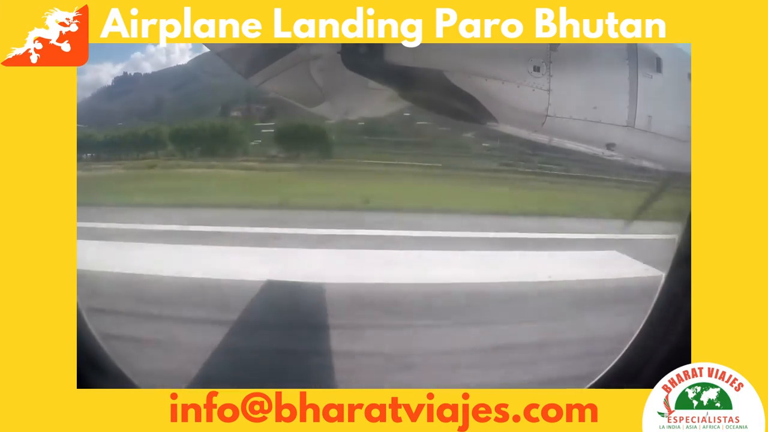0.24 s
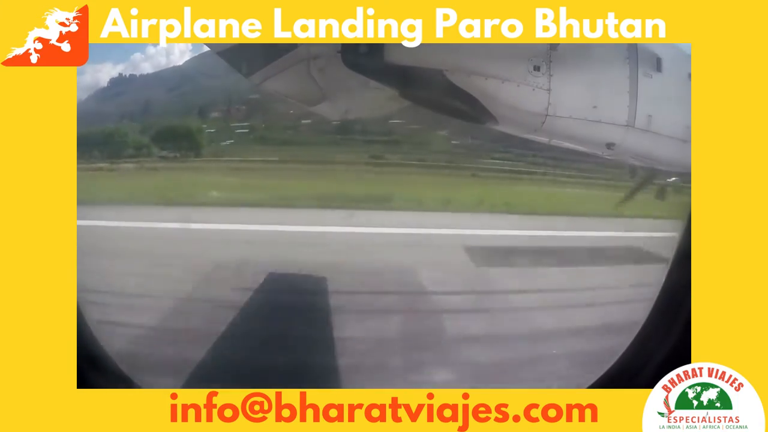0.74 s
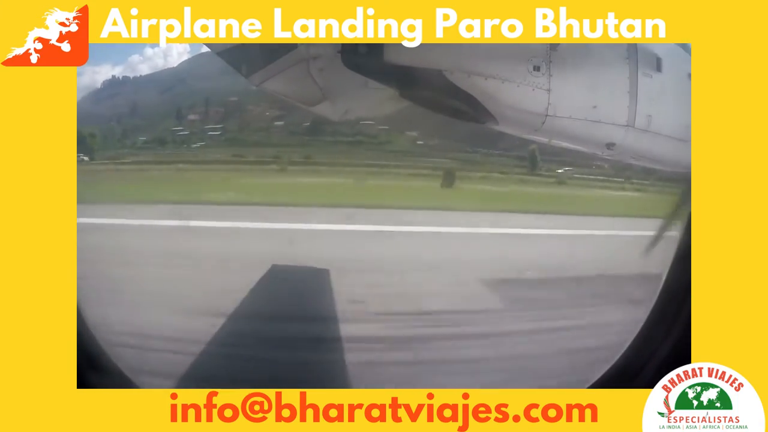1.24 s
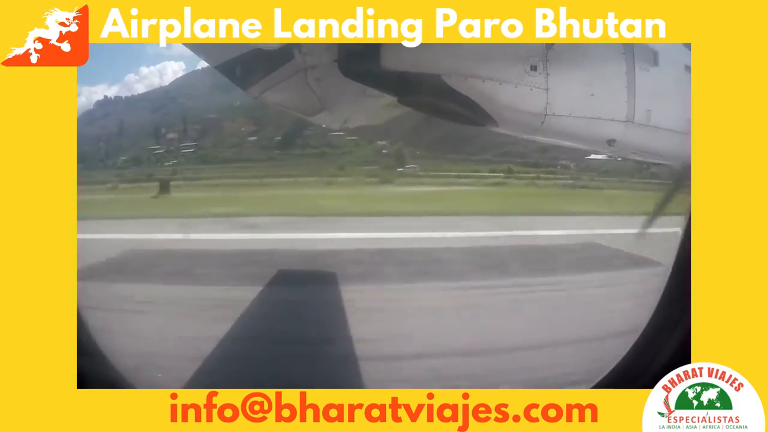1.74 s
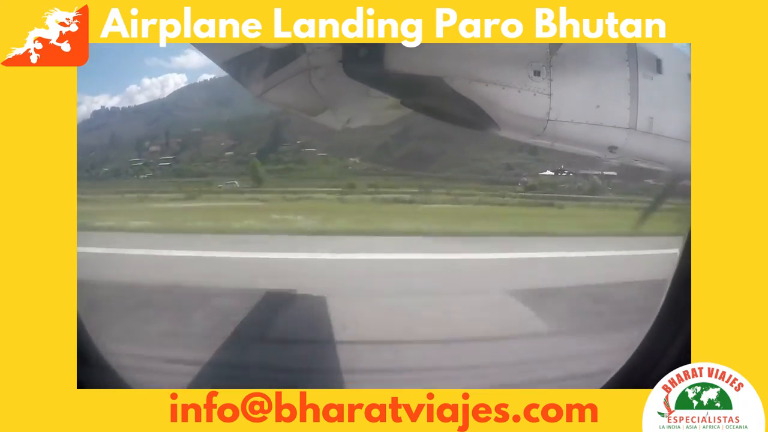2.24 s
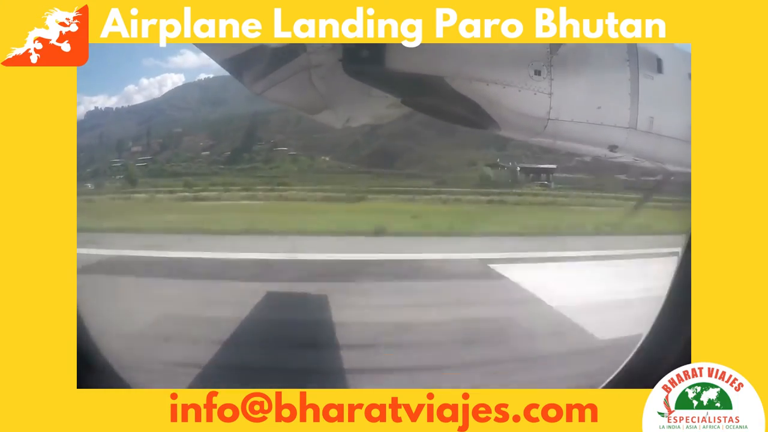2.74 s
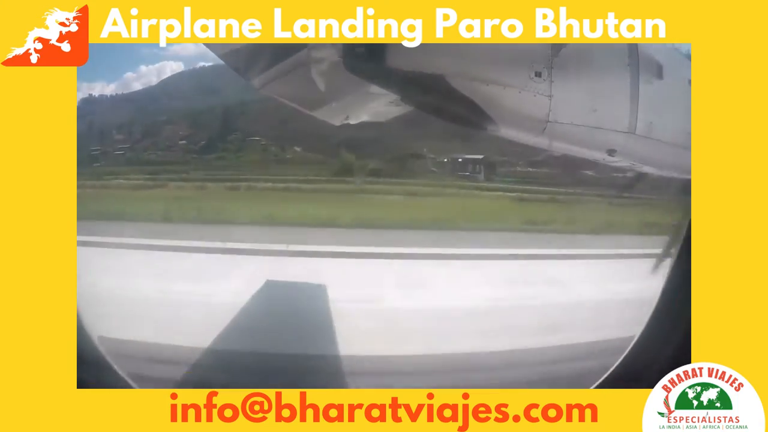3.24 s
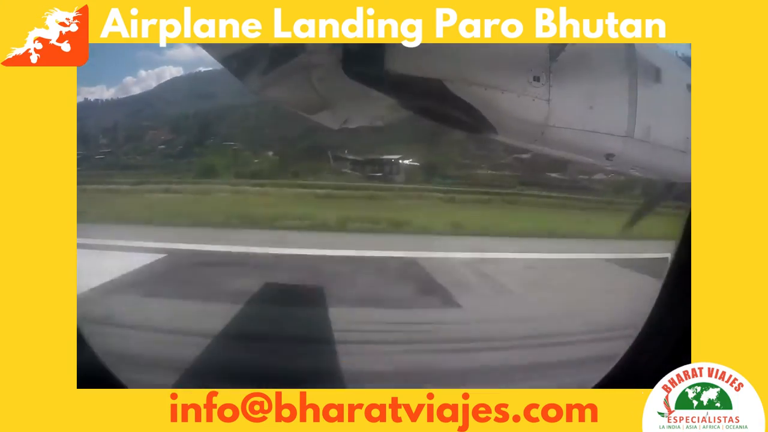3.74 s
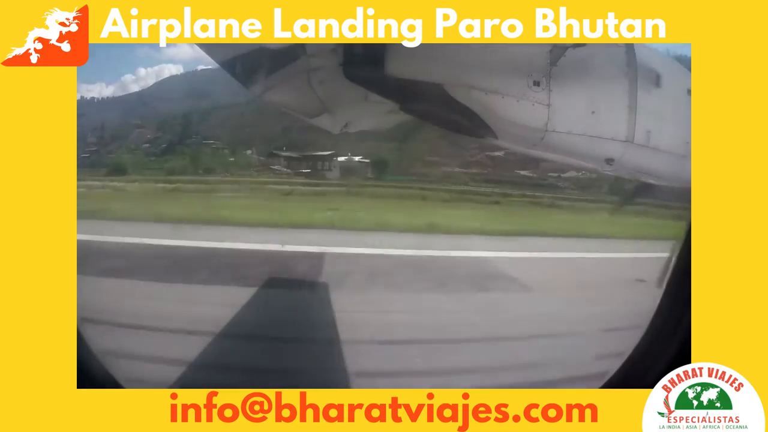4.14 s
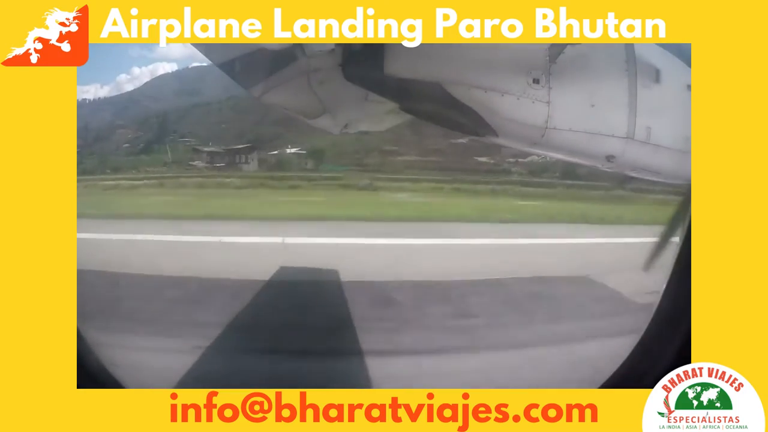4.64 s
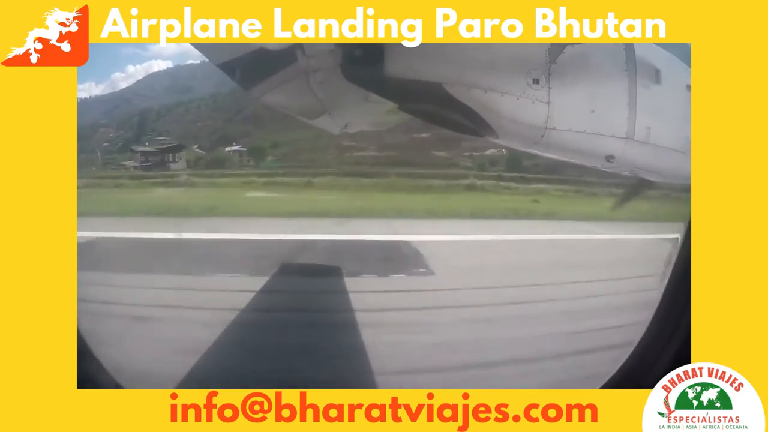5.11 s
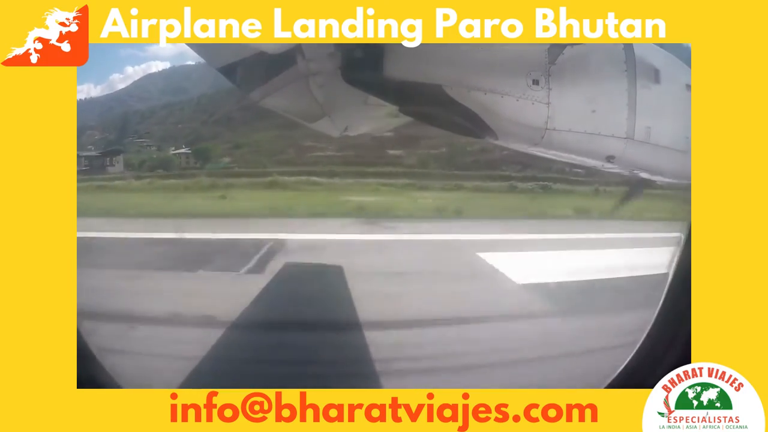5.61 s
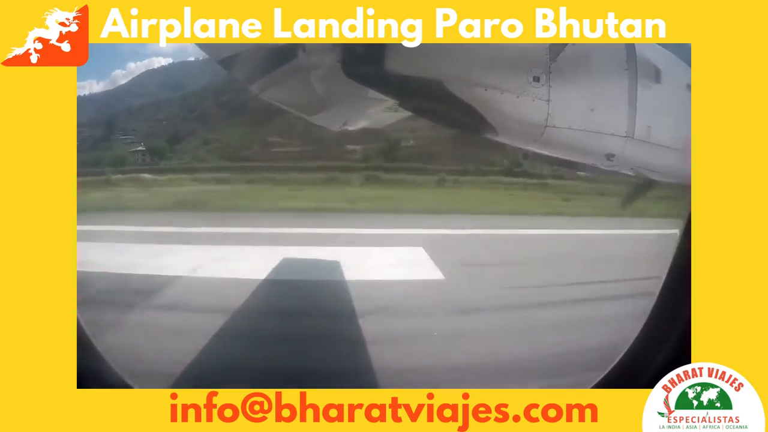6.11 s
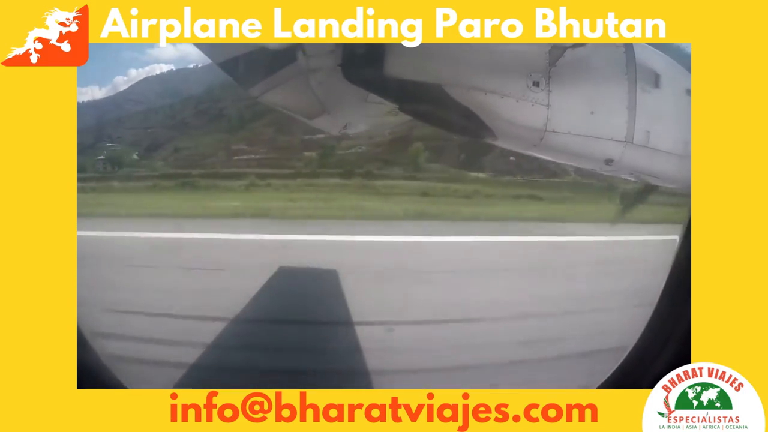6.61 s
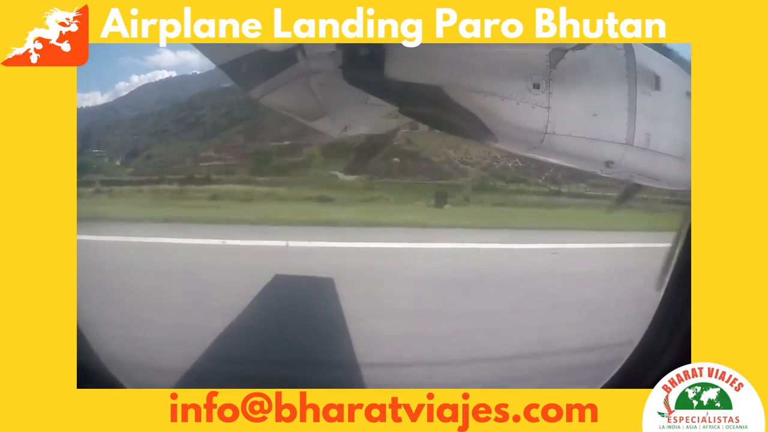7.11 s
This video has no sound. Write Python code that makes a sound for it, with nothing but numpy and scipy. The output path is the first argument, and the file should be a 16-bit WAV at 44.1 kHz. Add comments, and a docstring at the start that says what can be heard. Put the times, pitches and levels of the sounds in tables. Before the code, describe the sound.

A muffled low hum and soft air fill a passenger cabin before landing. At touchdown the floor shudders, the runway booms and roars, and fittings clatter in bursts. Midway the nose settles, with a rapid burst of hard plastic knocking, followed later by separate loud clacks. Broad engine noise builds, dips and returns as the aircraft slows. The microphone sits inside by the window, picking up loud knocks dry and close.

```python
"""Airliner cabin at landing

Air, vents and engine tones fill the cabin as shaped noise and wavering sines; then the wheels touch.
The tyres drone at multiples of their slowing rotation, the runway rumbles and roars as coloured noise,
and the engines' rush swells. Jolts, rattling fittings, a loose plastic case knocking on the window and
snapping wall trim are made by striking decaying sines, mostly with single clicks."""
import sys
import numpy as np
from scipy import signal
from scipy.fft import rfft, irfft
from scipy.io import wavfile

SR = 44100
rng = np.random.default_rng(int(sys.argv[2]) if len(sys.argv) > 2 else 0)


def persist_wave(psi):
    """Save psi, clipped to +-1, as 16-bit WAV."""
    counts = np.round(np.clip(psi, -1, 1) * 32767).astype(np.int16)
    wavfile.write(sys.argv[1], SR, np.atleast_2d(counts).T)


N = 324576
TIME = np.arange(N) / SR
# the main wheels touch; later the nose comes down and braking begins (s)
TOUCHDOWN_S, BRAKING_S = 1.545, 3.45


def tyres(flutter_db=2.0, wobble_hz=0.17):
    """Out-of-round tyres shake the airframe at multiples of their rotation; cabin resonances swell them."""
    # strength of the shaking at 1, 2, 3 .. times the rotation: relative level/dB
    orders_db = [-2, -3, -1, -1, -1.5, -2.5, -17, -11.5, 0]
    # how loudly the cabin answers, with resonances near 62, 118, 139 and 175 Hz: f/Hz, relative level/dB
    cabin_response = [(20, -32.5), (48, -37.5), (57, -22.5), (62.5, -14), (69, -29), (92, -35),
                      (105, -23.5), (119, -17.5), (125, -27), (137, -17.5), (141.3, -13.5), (144, -41),
                      (175, -27), (200, -49.5)]
    # weight on the tyres as the aircraft bounces and settles, as strength of shaking: t/s, level/dB
    tyre_load = [(1.545, -0.5), (1.72, 0.5), (2.15, 2.5), (2.3, -13), (2.48, -9), (2.68, -1), (3.15, -1),
                 (3.32, -6.5), (3.5, -1), (3.72, 2.5), (4.2, 0), (4.85, 1.5), (4.98, -8), (5.12, -0.5),
                 (7.36, -2)]
    spin_hz = 24.28                                   # turns per second at touchdown
    coast_hz_per_s, brake_hz_per_s = 0.6, 1.05        # rotation lost each second
    coasted_s = np.minimum(TIME, BRAKING_S) - TOUCHDOWN_S
    braked_s = np.maximum(TIME - BRAKING_S, 0)
    turn_hz = spin_hz - coast_hz_per_s * coasted_s - brake_hz_per_s * braked_s
    response_hz, response_db = np.transpose(cabin_response)
    drone = 0
    for k, order_db in enumerate(orders_db, start=1):
        flutter, wobble = drift(6), drift(8)
        cabin_db = np.interp(k * turn_hz, response_hz, response_db)
        level_db = order_db + cabin_db + flutter_db * flutter
        drone = drone + from_db(level_db) * tone(k * (turn_hz + wobble_hz * wobble))
    load_db, = in_time(tyre_load)
    return from_db(load_db) * drone


def runway():
    """Uneven pavement rumbles through the landing gear, the panels boom and the tread roars."""
    # colour of the low rumble: f/Hz, relative level/dB per Hz
    rumble_colour = [(10, -26), (20, -2.5), (28, 5), (45, 0), (60, 5.5), (78, 0), (98, -3), (125, -4),
                     (155, -12), (200, -9)]
    # colour of the booming panels: f/Hz, relative level/dB per Hz
    panel_colour = [(94, -44), (160, -2.5), (227, -2), (302, -8), (317, -9), (345, -7), (394, -2),
                    (420, -6.5), (454, -23), (480, -21), (620, -45), (1060, -120)]
    # colour of the tread's roar: f/Hz, relative level/dB per Hz
    roar_colour = [(260, -29.5), (450, 1), (496, -3), (601, -1), (650, -12), (707, 3.5), (817, -13.5),
                   (1070, -3), (1330, -21.5), (1510, -29.5), (1900, -28), (2470, -53.5), (4180, -120)]
    low_db, middle_db = roughness()
    rumble_db = rolling_db(coast_db=-20.5, nose_db=0.47, db_per_s=0.36) + low_db
    boom_db = rolling_db(coast_db=-31.5, nose_db=6.86, db_per_s=-0.7) + 0.71 * low_db
    roar_db = rolling_db(coast_db=-45.5, nose_db=2.8, db_per_s=-0.53) + middle_db + 3.2 * drift(25)
    rumble = from_db(rumble_db) * noise(rumble_colour)
    boom = from_db(boom_db) * noise(panel_colour)
    roar = from_db(roar_db) * noise(roar_colour)
    return rumble + boom + roar


def rolling_db(coast_db, nose_db, db_per_s, settle_s=0.035):
    """A rolling noise steps up as the nose wheel takes weight, then drifts as the aircraft slows."""
    braked_s = np.maximum(TIME - BRAKING_S, 0)
    return coast_db + nose_db * np.minimum(braked_s / settle_s, 1) + db_per_s * braked_s


def roughness():
    """Rough pavement changes the low sounds and the middle sounds by separate amounts in dB."""
    # rough stretches: middle t/s, length/s, lift of rumble and boom/dB, lift of roar and rattle/dB
    rough = [(1.568, 0.031, 3.5, 13), (1.728, 0.21, 5.5, 6), (2.493, 0.097, 9.5, 1), (2.8, 0.26, -1.5, 4),
             (3.16, 0.15, 6.5, 5.5), (3.57, 0.099, 2, 4), (4.396, 0.32, 2.5, 1.5), (4.688, 0.21, 3, 4),
             (6.064, 0.12, 4.5, 7.5)]
    low_db = lifts([(s, length, db) for s, length, db, _ in rough])
    middle_db = lifts([(s, length, db) for s, length, _, db in rough])
    return low_db, middle_db


def jolts():
    """Each jolt through the landing gear, cushioned by the struts, sets one airframe mode swinging."""
    # jolts: t/s, relative level/dB, f/Hz, time to die away by 60 dB/s
    jolt_table = [(1.566, -18, 50, 0.3), (1.627, -11, 170, 0.037), (2.24, -12.5, 59, 0.39),
                  (2.262, -14.5, 104, 0.39), (2.268, -12.5, 180, 0.067), (2.401, -12.5, 111.5, 0.78),
                  (2.45, -19.5, 226, 0.3), (3.408, -12.5, 61.2, 0.53), (4.346, -14, 226, 0.11),
                  (4.757, -17, 19, 0.51), (6.03, -17.5, 203, 0.29)]
    swings = 0
    for s, db, hz, t60 in jolt_table:
        swings = swings + ring(clicks([s], [from_db(db)]), hz, t60)
    return from_db(6.5) * soften(swings, hz=313)


def case_knocks(case_db=4.5, soft_hz=3900, hard_hz=8500, scatter_db=-24, scatter_s=0.0051):
    """Each knock of the loose case rings all its modes at once; harder contacts are shorter and brighter."""
    # knocks on the window, singly or in a chatter: t/s, relative level/dB
    knocks = [(3.564, -20), (3.5692, -13.5), (3.5787, -8), (3.588, -12), (3.597, -7), (3.604, -8),
              (3.6124, -11), (3.639, -9.5), (3.647, -8), (3.6573, -16), (3.6735, -7), (3.683, -12.5),
              (3.6902, -14), (3.7, -10), (3.7081, -20.5), (3.7682, -2), (3.7817, -20), (3.7955, -12.5),
              (3.802, -29), (3.847, -20.5), (3.865, -17.5), (3.8733, -17), (4.8261, -15), (4.8576, -18.5),
              (4.9581, 1.5), (4.9658, -11.5), (5.0527, -10), (5.0606, -13), (5.0791, -13.5),
              (5.2736, -20.5), (5.3515, -11), (5.441, -2), (5.4584, -22.5), (5.474, -10), (5.8445, -10),
              (5.8518, -14), (5.8896, -16.5)]
    # modes of the plastic case: f/Hz, relative level/dB, time to die away by 60 dB/s
    case_modes = [(475, -16, 0.016), (700, -18.5, 0.059), (1033, -1.5, 0.015), (1384, -11, 0.012),
                  (1712, -20, 0.022), (2196, -11.5, 0.012), (2550, -13.5, 0.01), (3070, -6, 0.0067),
                  (3334, -11.5, .011), (3910, -25.5, 0.024), (4260, -32, 0.021), (5960, -27, 0.0093),
                  (7400, -25, 0.0076), (9300, -16, 0.0028), (11400, -20.5, .008)]
    # frequencies that the case soaks up: f/Hz, width/Hz
    case_dips = [(5150, 1200), (8600, 120)]
    # colour of the scatter off the window and seats: f/Hz, relative level/dB per Hz
    scatter_colour = [(500, 2), (1000, 1), (1700, -8), (3200, -5), (4400, -15.5), (5150, -36.5),
                      (6000, -25), (9000, -31)]
    # each knock lands on another spot, so every mode varies: level (dB), share of its pitch
    spread_db, detune_share = 1.1, 0.012
    edge_hz, treble_db = 4600, -7.5     # the knocks are much duller above this edge
    bend = 0.76                         # strength of the delay of the lows, 0 to 1
    case = np.zeros(N)
    for s, db in knocks:
        contact_hz = soft_hz + (hard_hz - soft_hz) * from_db(db)
        force = soften(from_db(db + case_db) * signal.unit_impulse(SR // 10), contact_hz)
        vary_db = spread_db * rng.standard_normal(len(case_modes))
        detunes = 1 + detune_share * rng.standard_normal(len(case_modes))
        for (hz, mode_db, t60), extra_db, detune in zip(case_modes, vary_db, detunes):
            add(case, s, from_db(mode_db + extra_db) * ring(force, hz * detune, t60))
    case = remove_lows(case, 300, order=2)
    treble = remove_lows(case, edge_hz, order=8)
    case = hollow(soften(case, edge_hz, order=8) + from_db(treble_db) * treble, case_dips)
    case = signal.lfilter([-bend, 1], [1, -bend], case)      # bending waves: the lows arrive later
    s, db = np.transpose(knocks)
    scatter_envelope = decaying(clicks(s, from_db(db + scatter_db)), scatter_s)
    return case + noise(scatter_colour, scatter_envelope)


def fittings(bump_db=1.0, chatter_db=-9.0, chatter_s=0.011):
    """Seats and bins ring in many small contacts and in louder bumps that chatter as they settle."""
    # modes of the seats and bins: f/Hz, relative level/dB, time to die away by 60 dB/s
    fitting_modes = [(264, -10, 0.032), (404, -8.5, 0.0056), (562, -0.5, 0.024), (715, -1.5, 0.024),
                     (917, -4.5, 0.029), (1040, -6.5, 0.027), (1540, -14.5, 0.0077), (2200, -16.5, 0.0044),
                     (3200, -28.5, .005)]
    # bumps of the seats and overhead bins: t/s, relative level/dB, brightness/dB per octave
    bump_table = [(1.552, -32, 11), (1.562, -33, 10), (1.573, -35, 9), (1.584, -45, 7), (1.628, -24.5, 8),
                  (1.653, -32, 9), (1.662, -31, -8), (2.206, -32.5, -11), (2.247, -29, -8),
                  (2.45, -31, 13.5), (2.463, -29, 3), (2.513, -28, 4), (2.524, -25, 6), (2.531, -21, 8),
                  (2.558, -30.5, 2), (2.608, -36, -15), (2.684, -30.5, 1), (2.692, -33.5, 2),
                  (2.721, -27.5, -6), (2.743, -23.5, 1), (2.753, -31, 1), (2.787, -33, -2), (2.8, -35, 0),
                  (2.826, -31, -3), (2.839, -35, 0), (2.85, -28, -14.5), (2.867, -27, -6), (2.877, -26, -9),
                  (2.897, -28.5, 1), (2.916, -27.5, 0), (3.017, -24, 1), (3.026, -22.5, 9),
                  (3.083, -23.5, -5), (3.119, -23, 3), (3.132, -38, 0), (3.16, -26.5, 4), (3.203, -35, -6),
                  (3.449, -23.5, 4), (3.531, -23, 11), (4.129, -27, -2), (4.146, -28.5, 0), (4.238, -26, 3),
                  (4.26, -28, -2), (4.333, -29, -8), (4.349, -28.5, 4), (4.387, -30, -16),
                  (4.411, -26.5, -1), (4.437, -26.5, -1.5), (4.545, -23.5, 1), (4.581, -33, -11),
                  (4.671, -29, -3), (4.698, -32, 4), (6.02, -34, 0), (6.083, -29, -5), (6.168, -25.5, 7)]
    contacts_per_s, contact_spread_db = 85, 5.0
    chatter_per_s = 500         # contacts per second while a bumped fitting settles
    mode_spread_db = 2.0        # how much each mode varies from contact to contact
    padding_hz = 2800           # padding dulls the contacts above this
    _, middle_db = roughness()
    contact_s = np.flatnonzero(rng.random(N) < contacts_per_s / SR) / SR
    count = len(contact_s)
    contact_db = contact_spread_db * np.clip(rng.standard_normal(count), -2, 1.5)
    chatter_hits = rng.random(N) < chatter_per_s / SR
    chatter = from_db(chatter_db) * chatter_hits * rng.choice([-1, 1], N)
    s, db, tilt = np.transpose(bump_table)
    rattle = bumps = 0
    for hz, mode_db, t60 in fitting_modes:
        # each contact lands on another spot: the push and level of a mode change
        sides = rng.choice([-1, 1], count)
        small_db = contact_db + mode_db + mode_spread_db * rng.standard_normal(count)
        rattle = rattle + ring(clicks(contact_s, sides * from_db(small_db)), hz, t60)
        tilt_db = tilt * np.log2(hz / 800)
        level_db = db + mode_db + tilt_db + mode_spread_db * rng.standard_normal(len(s))
        blows = clicks(s, rng.choice([-1, 1], len(s)) * from_db(level_db))
        settling = chatter * decaying(np.abs(blows), chatter_s)
        bumps = bumps + ring(blows + settling, hz, t60)
    # rough pavement makes the small contacts louder
    rattle_db = rolling_db(coast_db=-49.5, nose_db=6.8, db_per_s=-0.88) + 0.69 * middle_db
    rattle = from_db(rattle_db) * rms_one(rattle)
    return soften(rattle + from_db(bump_db) * bumps, padding_hz)


def trim_snaps(start_hz=800, end_hz=2700, chirp_s=0.0034, crack_s=0.0043):
    """A panel edge slips: a dry crack and a chirp of a few milliseconds, then faint rings."""
    # snaps: t/s, relative level/dB, high ping over that/dB, dry crack over that/dB
    snaps = [(1.68, -13, -37, -8.5), (1.9665, -14, -16.5, -7.5), (3.4953, -15.5, -61, -15.5),
             (3.515, -24, -48, -15), (3.9654, -17.5, -44, -11), (6.002, -13.5, -42, -13)]
    # frequencies that the trim panel soaks up: f/Hz, width/Hz
    trim_dips = [(1150, 89), (1930, 94), (2280, 89), (3050, 250)]
    # colour of the crack: f/Hz, relative level/dB per Hz
    crack_colour = [(450, 8), (750, 7), (1100, -7), (2400, 14.5), (3200, 1.5), (4800, -10), (6500, -19),
                    (12000, -43)]
    s, db, ping_db, crack_db = np.transpose(snaps)
    age = TIME[:SR // 50] / chirp_s      # 1 when the pitch stops rising
    hz = start_hz + (end_hz - start_hz) * np.minimum(age, 1)
    chirp = np.sin(2 * np.pi * np.cumsum(hz) / SR) * np.exp(-1.7 * age ** 2)
    slips = clicks(s, from_db(db))
    chirps = from_db(2.5) * signal.fftconvolve(slips, chirp)[:N]
    cracks = noise(crack_colour, decaying(clicks(s, from_db(db + crack_db)), crack_s))
    low_ring = from_db(-18.0) * ring(slips, hz=1900, t60=0.086)
    high_ping = ring(clicks(s, from_db(db + ping_db)), hz=4910, t60=0.032)
    return hollow(chirps + cracks, trim_dips) + low_ring + high_ping


def rustle(start_db=-69, growth_db_per_s=2.5, flicker_db=1.8):
    """Seats and clothing rub as the cabin sways: faint noise that grows and swells with each sway."""
    # sways: middle t/s, length/s, lift/dB
    sways = [(1.75, 0.42, 15.5), (2.11, .1, 11.5), (2.49, 0.31, 13), (2.98, 0.11, 10), (3.62, 0.44, 8.5),
             (4.07, 0.063, 13.5), (4.42, 0.41, 5), (4.8, 0.11, 10.5), (6.2, 0.17, 4)]
    # colour of the rustle: f/Hz, relative level/dB per Hz
    cloth_colour = [(1500, 4), (3200, 10.5), (4800, 0.5), (5800, -2), (7000, -3.5), (8500, -13.5),
                    (10500, -12.5), (16000, -32.5)]
    level_db = start_db + growth_db_per_s * (TIME - TOUCHDOWN_S) + lifts(sways)
    return noise(cloth_colour, from_db(level_db + flicker_db * drift(21)))


def engines(on_ground):
    """Wavering shaft and blade tones drop as the wheels touch; the exhaust's noisy rush builds."""
    # engine tones on the approach: f/Hz, level/dB
    engine_tones = [(59.2, -30.5), (140, -32.5), (700, -55), (1197, -55), (2390, -60.5), (2875, -75.5),
                    (3591, -60)]
    # level of the rush, idle at first and building for the rollout: t/s, level/dB
    thrust = [(0, -61), (1.5, -63), (2.0, -53), (2.9, -51), (4.2, -45), (4.8, -46.5), (5.4, -51.5),
              (6.2, -45), (7.36, -46.5)]
    # brief surges of the rush: middle t/s, length/s, lift/dB
    surges = [(1.7, 0.23, 14.5), (2.5, 0.091, 10), (4.81, 0.093, 6)]
    # colour of the rush: f/Hz, relative level/dB per Hz
    rush_colour = [(820, -51), (1400, -5), (1510, -4), (1930, -8), (2110, -3.5), (2360, 0), (2580, 0),
                   (2850, -6.5), (3400, -0.5), (3670, -8), (3950, -7.5), (4510, -25), (5860, -44.5),
                   (9920, -120)]
    tones = 0
    for hz, db in engine_tones:
        wander, waver = drift(4), drift(5)
        tones = tones + from_db(db + 2 * wander) * tone(hz + 1.1 * waver)
    thrust_db, = in_time(thrust)
    rush_db = thrust_db + lifts(surges) + 0.5 * drift(23)
    return tones * from_db(-9 * on_ground) + from_db(rush_db) * noise(rush_colour)


def cabin_air():
    """Air rumbles along the fuselage and hisses from the vents, as two slowly wavering noises."""
    # colour of the air along the fuselage: f/Hz, relative level/dB per Hz
    airflow_colour = [(15, -11.5), (32, -3.5), (59, -3), (82, -5), (110, -1.5), (144, -2), (198, -11.5),
                      (230, -13), (260, -16), (337, -19.5), (400, -15), (460, -33), (600, -30.5),
                      (700, -29), (800, -44)]
    # colour of the vents: f/Hz, relative level/dB per Hz
    vent_colour = [(750, -16), (870, -4), (1100, 2), (1330, -11), (1600, -6), (1950, -11.5), (2430, 2),
                   (2950, -9.5), (3500, -4), (4000, -14), (4550, -24.5), (6400, -30), (6800, -25.5),
                   (7300, -31), (10000, -33.5), (16000, -45.5)]
    airflow = from_db(-21.5 + 1.1 * drift(10)) * noise(airflow_colour)
    vents = from_db(-48.0 + 1.1 * drift(18)) * noise(vent_colour)
    return airflow + vents


def from_db(db):
    """Turn decibels into a plain gain."""
    return 10 ** (np.asarray(db) / 20)


def rms_one(x):
    """Scale to an average power of 1."""
    return x / np.sqrt(np.mean(x ** 2) + 1e-20)


def in_time(rows):
    """Join each column of a table of moments by straight lines."""
    s, *columns = np.transpose(rows)
    return [np.interp(TIME, s, c) for c in columns]


def noise(spectrum, envelope=1):
    """White noise under an envelope, then coloured by a spectrum; its rms follows the envelope."""
    hz, db = np.transpose(spectrum)
    octave = np.log2(np.maximum(np.arange(N // 2 + 1) * SR / N, 1))
    points = np.log2(hz)
    outside = np.abs(octave - np.clip(octave, points[0], points[-1]))
    # beyond the ends of the table the colour falls by 48 dB per octave
    colour = rms_one(from_db(np.interp(octave, points, db) - 48 * outside))
    return irfft(rfft(envelope * rng.standard_normal(N)) * colour, N)


def drift(rate):
    """Slow random wandering of spread 1, with little movement faster than the rate in Hz."""
    hz = np.arange(N // 2 + 1) * SR / N
    return rms_one(irfft(rfft(rng.standard_normal(N)) / (1 + (hz / rate) ** 4), N))


def clicks(seconds, gains):
    """Put one impulse at each moment."""
    return np.bincount(np.round(np.asarray(seconds) * SR).astype(int), gains, N)[:N]


def ring(force, hz, t60):
    """A resonator: a unit click starts a sine of height about 1 that dies away by 60 dB in t60 seconds."""
    r = from_db(-60 / (t60 * SR))      # shrinkage per sample
    w = 2 * np.pi * hz / SR            # turn per sample, radians
    return signal.lfilter([0, np.sin(w)], [1, -2 * r * np.cos(w), r * r], force + 1e-18)


def soften(x, hz, order=2):
    """Low-pass: dull the sound above a frequency."""
    return signal.sosfilt(signal.butter(order, min(hz, .45 * SR), fs=SR, output="sos"), x + 1e-18)


def remove_lows(x, hz, order):
    """High-pass: weaken the sound below a frequency."""
    return signal.sosfilt(signal.butter(order, hz, "high", fs=SR, output="sos"), x + 1e-18)


def hollow(x, dips):
    """Cut a notch at each frequency, with its width in Hz."""
    for hz, width_hz in dips:
        x = signal.lfilter(*signal.iirnotch(hz, hz / width_hz, fs=SR), x + 1e-18)
    return x


def tone(hz):
    """A sine of rms 1 that follows a pitch curve from a random starting phase."""
    return np.sqrt(2) * np.sin(2 * np.pi * (np.cumsum(hz) / SR + rng.random()))


def decaying(force, seconds):
    """Turn each impulse into an envelope that dies away exponentially."""
    return signal.lfilter([1], [1, -np.exp(-1 / (seconds * SR))], force + 1e-18)


def swell(middle_s, length_s):
    """A smooth rise and fall of height 1, with the given length at half height."""
    return .5 ** ((2 * (TIME - middle_s) / length_s) ** 2)


def lifts(rows):
    """Sum the dB changes of a table of swells."""
    return sum(db * swell(s, length) for s, length, db in rows)


def add(track, s, sound):
    """Mix a short sound into a track at the given moment."""
    part = track[round(s * SR):][:len(sound)]
    part += sound[:len(part)]


def scene():
    """Air and engines sound throughout; the continuous ground noises are let in at touchdown."""
    on_ground = np.clip((TIME - TOUCHDOWN_S) / 0.0051, 0, 1)
    rolling = on_ground * (tyres() + runway() + fittings() + rustle())
    strikes = jolts() + case_knocks() + trim_snaps()
    background = engines(on_ground) + cabin_air()
    return (rolling + strikes + background)[None]


def record(dry, top=0.93, overload_hz=4400, harsh_share=0.36, cutoff_hz=15800):
    """Round the loudest peaks, mostly below the treble; ease the ends and cut the highest treble."""
    eased = np.minimum(np.minimum(TIME, TIME[::-1]) / .004, 1)
    excess = dry - dry / (1 + (dry / top) ** 4) ** .25
    smooth = signal.sosfiltfilt(signal.butter(6, overload_hz, fs=SR, output="sos"), excess)
    # only a share of the excess in the treble is taken away
    rounded = dry - smooth - harsh_share * (excess - smooth)
    top_cut = signal.ellip(10, .1, 80, cutoff_hz, fs=SR, output="sos")
    return signal.sosfilt(top_cut, eased * from_db(-0.23) * rounded)


dry = scene()
out = record(dry)
persist_wave(out)
```